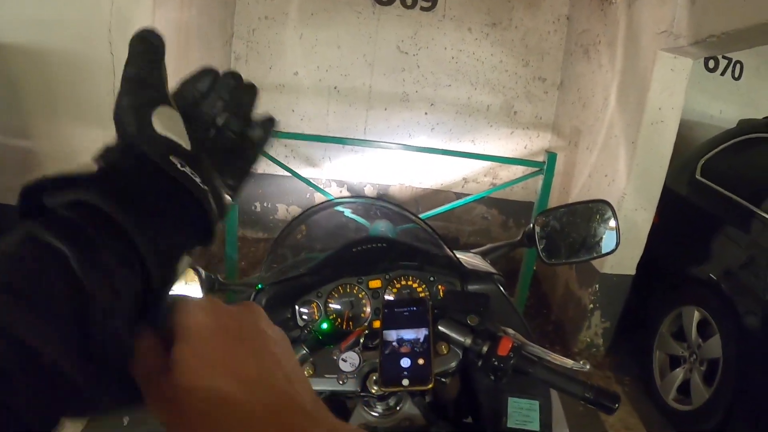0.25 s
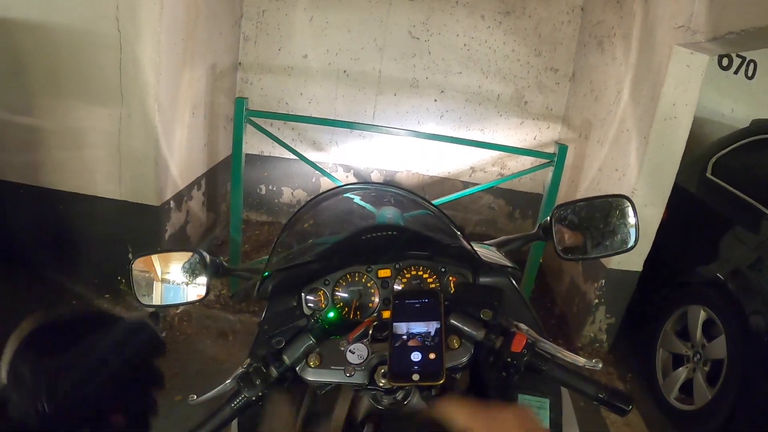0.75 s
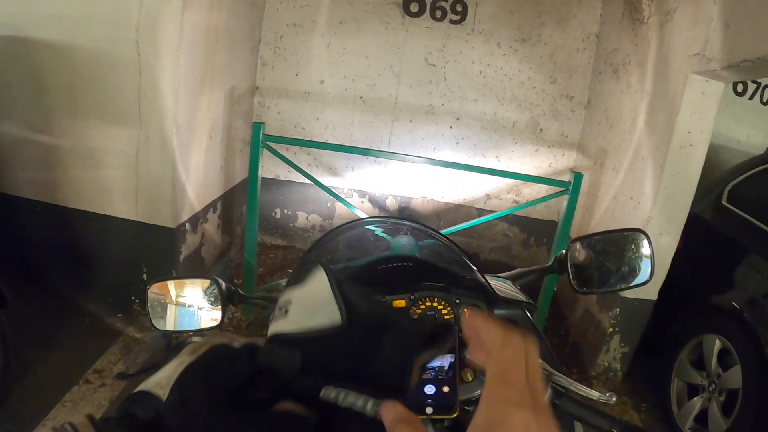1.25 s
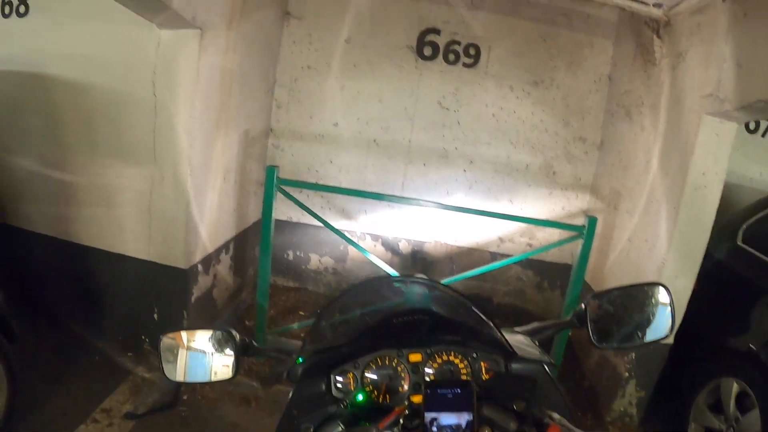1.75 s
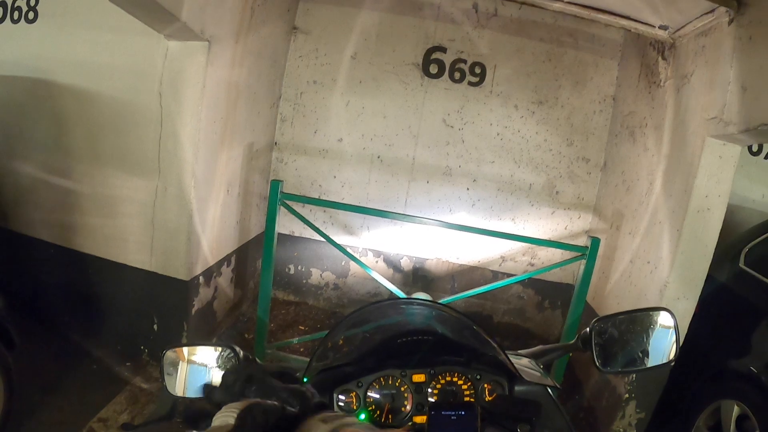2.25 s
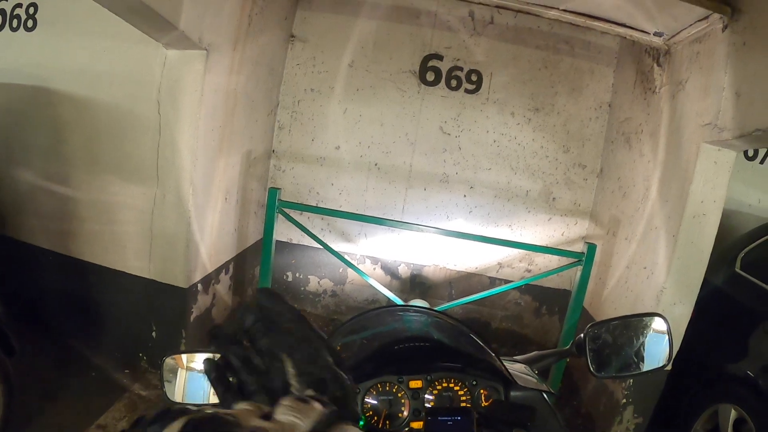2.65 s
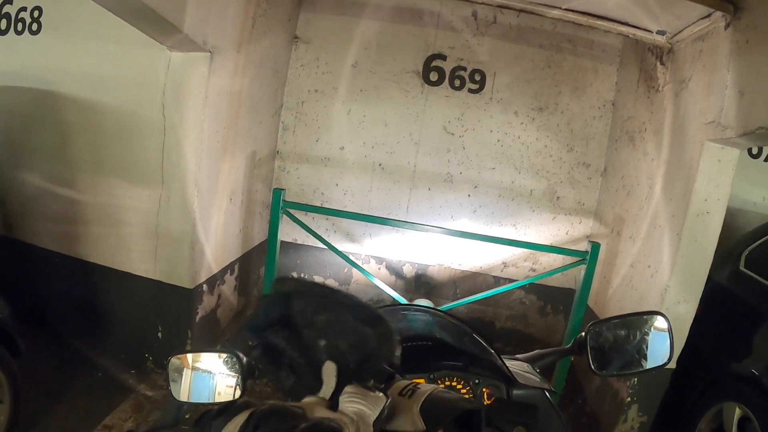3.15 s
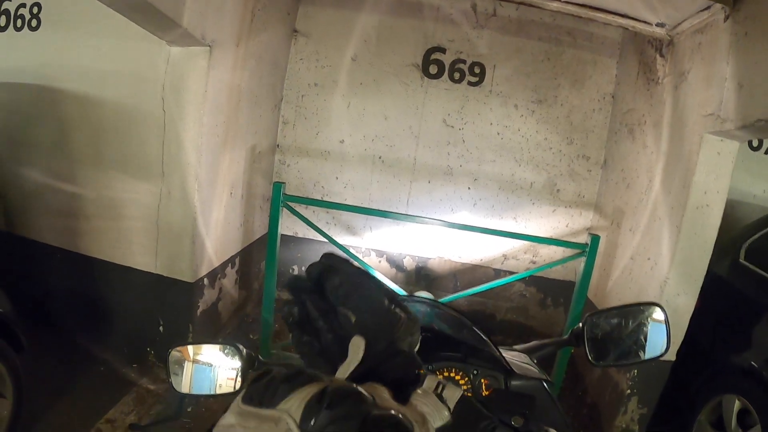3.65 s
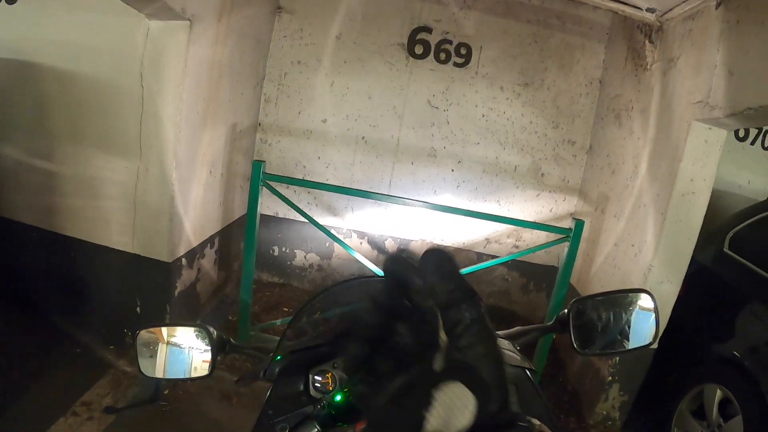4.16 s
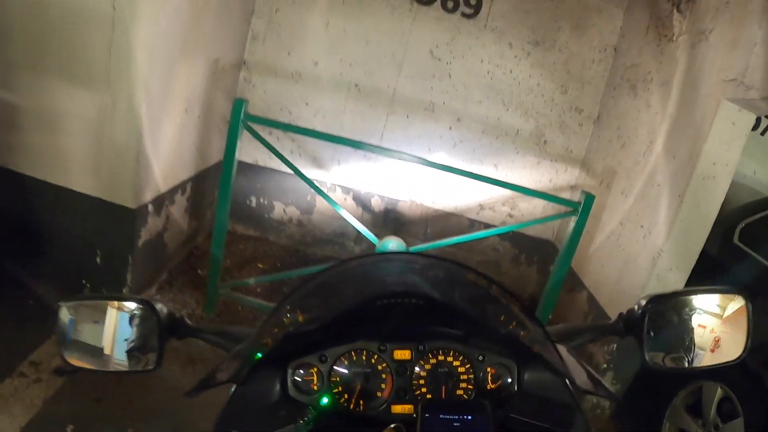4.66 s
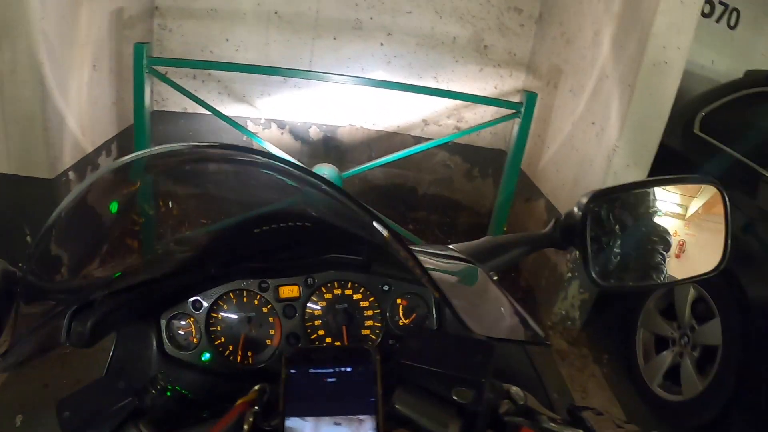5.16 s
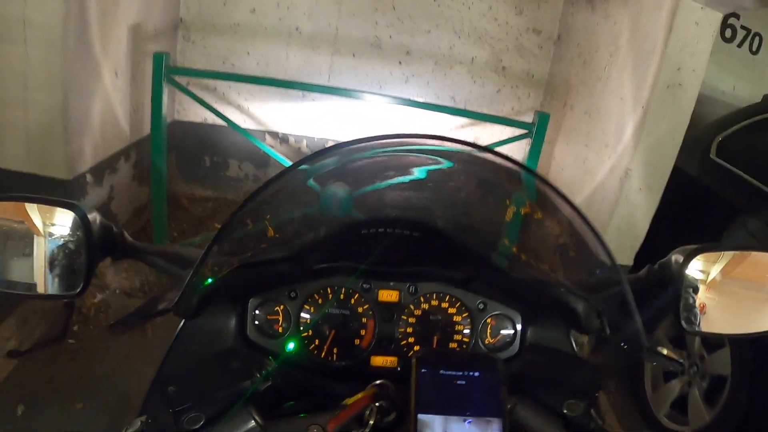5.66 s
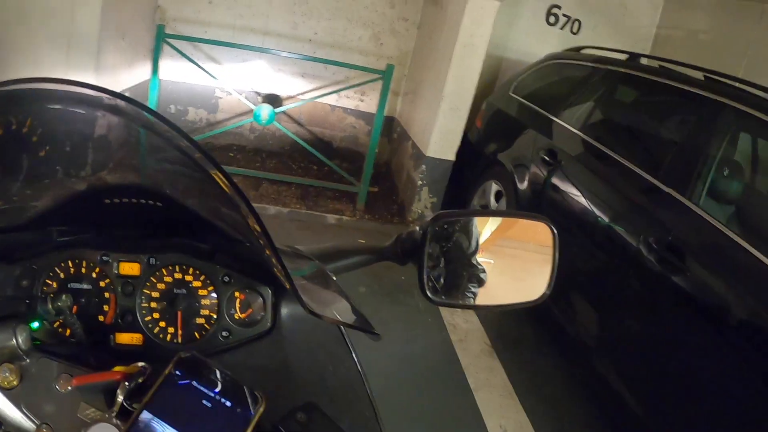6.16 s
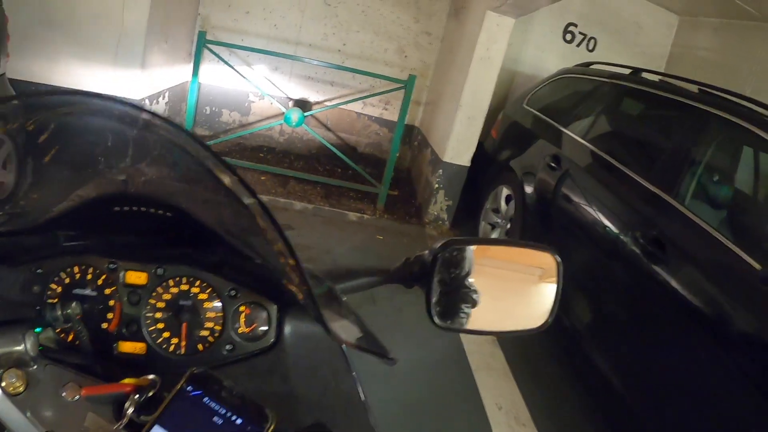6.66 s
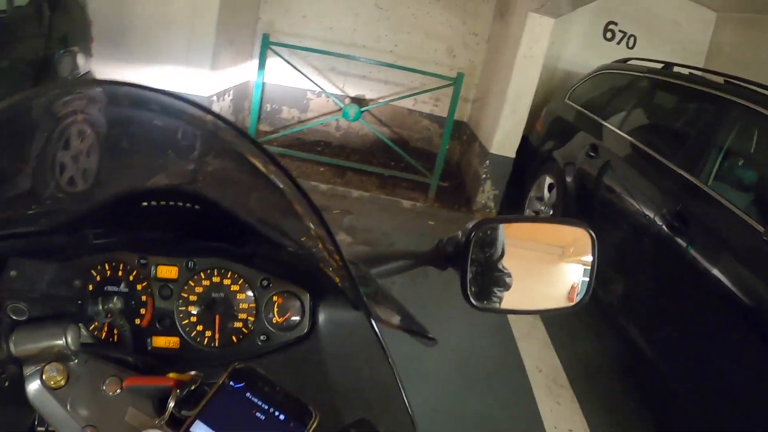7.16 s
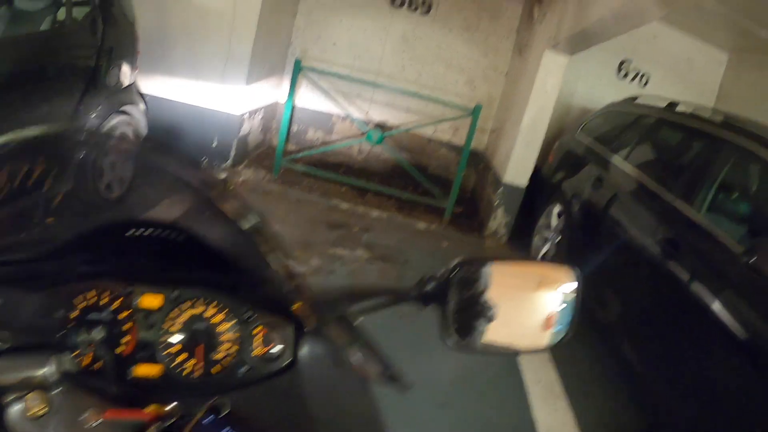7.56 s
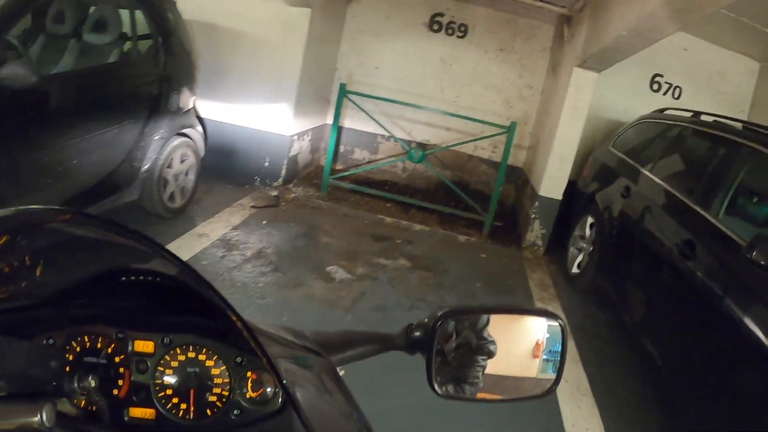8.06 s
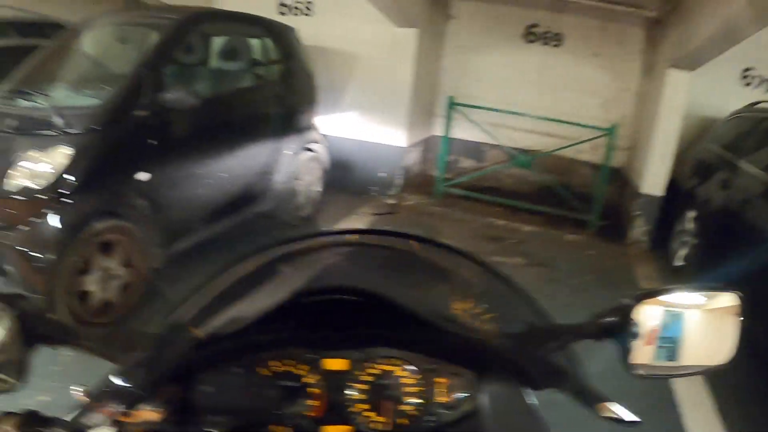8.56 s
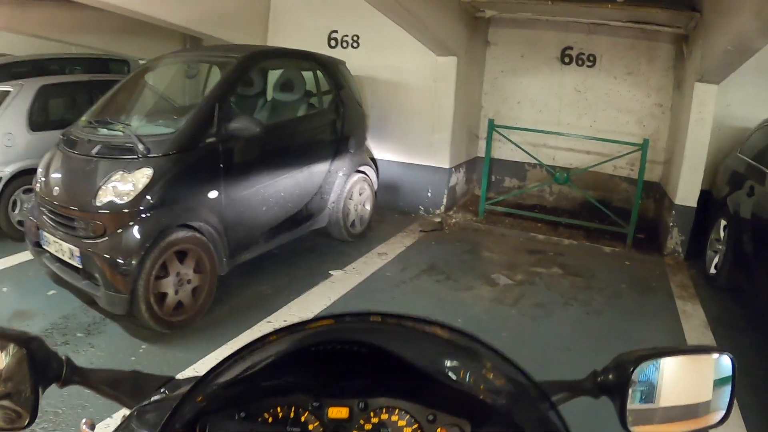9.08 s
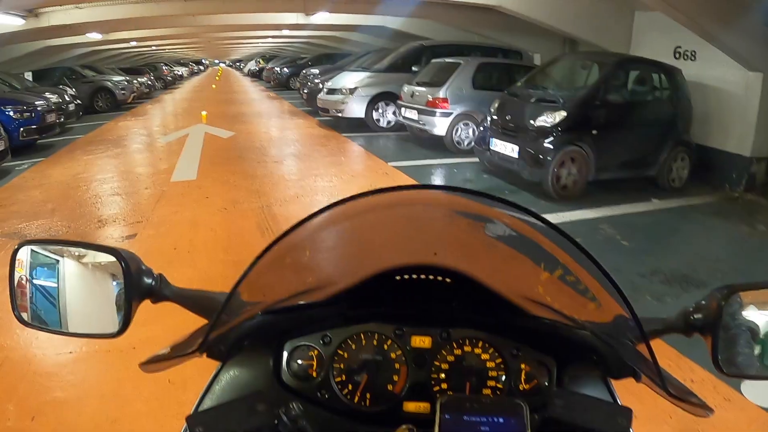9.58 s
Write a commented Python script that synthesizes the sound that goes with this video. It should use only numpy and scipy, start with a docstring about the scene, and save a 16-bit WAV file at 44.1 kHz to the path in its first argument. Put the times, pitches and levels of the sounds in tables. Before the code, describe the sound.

The engine is already running: a deep, uneven putter of about thirty-five pulses a second, with bright ticking and clattering above. Concrete walls add a short, dense echo. Another low engine close by revs and falls back, making the bass throb. Clutch whirr grows during the manoeuvre, with tiny hard clicks, fabric rubbing and fleeting rough squeals, before a modest closing rise. Close stereo pickup at the helmet.

```python
"""Exhaust pulses of an unevenly idling four-cylinder motorcycle boom in a concrete underground car park.
Heard from the rider's helmet: pulses ring the pipe, shaped noise makes the valve clatter, clutch whirr and rustle.
Small parts click as the bike is backed out of its bay; slipping clutch plates squeal in gliding tones.
A second bike, built from harmonics alone, idles and revs close by, beating against the first.
At the end the revs rise as the rider pulls away."""
import sys
import numpy as np
from scipy import signal
from scipy.fft import rfft, irfft, next_fast_len
from scipy.io import wavfile
from scipy.ndimage import uniform_filter1d, minimum_filter1d

SR = 44100
rng = np.random.default_rng(int(sys.argv[2]) if len(sys.argv) > 2 else 0)


def master_out(mix):
    """Clip the mix to full scale and print it as 16-bit PCM to the path in sys.argv[1]."""
    frames = np.transpose(np.atleast_2d(mix))
    ceiling = np.clip(frames, -1, 1)
    pcm = np.round(ceiling * 32767).astype(np.int16)
    wavfile.write(sys.argv[1], SR, pcm)


N = 433062
T = np.arange(N) / SR  # seconds
HZ = np.fft.rfftfreq(16384, 1 / SR)  # frequency grid of every body response

# In all functions "turns" counts firings of the engine, with fractions; levels in dB precede each layer's trim.


def amp(db):
    """Decibels to gain."""
    return 10 ** (np.asarray(db) / 20)


def unit(x):
    """Scales to rms 1."""
    return x / np.sqrt(np.mean(x ** 2) + 1e-20)


def curves(rows):
    """Each column of a table, joined by straight lines sample by sample."""
    s, *columns = np.transpose(rows)
    return [np.interp(T, s, column) for column in columns]


def at_hz(points, hz):
    """Reads a spectrum on a log-frequency axis."""
    f, value = np.transpose(points)
    return np.interp(np.log(hz + 1), np.log(f + 1), value)


def peaks(modes):
    """Magnitude of a set of resonances, their powers added."""
    power = sum(amp(db) ** 2 / (1 + ((HZ - hz) / width) ** 2) ** 2 for hz, width, db in modes)
    return np.sqrt(power)


def shape(points):
    """Magnitude of a spectrum that falls away steeply above its last point."""
    return amp(at_hz(points, HZ)) / (1 + (HZ / points[-1][0]) ** 4)


def ring(x, gain):
    """Passes x through a causal, minimum-phase body with this magnitude response."""
    log_gain = np.log(np.maximum(gain, 1e-5))
    mirrored = np.r_[log_gain, log_gain[-2:0:-1]]
    response = np.exp(np.conj(signal.hilbert(mirrored)))
    impulse = np.fft.ifft(response).real
    return signal.fftconvolve(np.atleast_2d(x), impulse[None], axes=1)[:, :N]


def fade(blows, decay_s):
    """Lets each impulse die away exponentially."""
    return signal.lfilter([1], [1, -np.exp(-1 / (decay_s * SR))], blows + 1e-12)


def steady(x, span_s):
    """Holds the running level near 1, keeping the quick ups and downs."""
    power = uniform_filter1d(x ** 2, max(int(span_s * SR), 1), axis=-1)
    return x / np.sqrt(abs(power) + 1e-3 * np.mean(x ** 2))


def swelled(level, swell):
    """Widens or narrows the swings of a dB curve about its mean."""
    return level.mean() + swell * (level - level.mean())


def waver(rate_hz):
    """A slow random wander of rms 1."""
    s = np.arange(0, N / SR + 1, 1 / 100)
    lowpass = signal.butter(2, min(rate_hz, 40), fs=100, output="sos")
    drift = signal.sosfilt(lowpass, rng.standard_normal(len(s)))
    return unit(np.interp(T + 1, s, drift))  # skips the filter's first second


def arches(spells):
    """One smooth arch for each spell, as high as its row says."""
    rise = np.zeros(N)
    for s, length, height in spells:
        spell = slice(*np.searchsorted(T, [s - length / 2, s + length / 2]))
        rise[spell] += height * np.cos(np.pi * (T[spell] - s) / length)
    return rise


def garage(x, wet_db, count=3, drift_hz=0.831):
    """Adds the concrete's echoes, which die soonest in the top treble and shift as the rider moves."""
    # The garage's reverberation. Each row: frequency in Hz, time to fall 60 dB in seconds.
    decay_times = [(40, 0.32), (150, 1), (500, 0.8), (2000, 0.94), (6000, 0.52), (14000, 0.12)]
    sparse = rng.random((count, 2, SR)) < 3000 / SR  # about 3000 echoes a second
    echoes = rng.standard_normal((count, 2, SR)) * sparse
    hz, t, z = signal.stft(echoes, SR, nperseg=256)
    fall = amp(-60 * t / at_hz(decay_times, hz)[:, None])
    tails = signal.istft(z * fall, SR)[1]
    tails /= np.linalg.norm(tails, axis=-1, keepdims=True)
    phase = drift_hz * T + np.arange(count)[:, None] / count
    shares = np.sqrt(2 / count) * np.cos(np.pi * phase)
    wet = sum(signal.oaconvolve(x * share, tail, axes=1)[:, :N] for share, tail in zip(shares, tails))
    return x + amp(wet_db) * wet


def strokes(turns, strength, spread, jitter_s):
    """One impulse at each whole count, each of its own strength and a little early or late."""
    at = np.flatnonzero(np.diff(np.floor(turns), prepend=-1) > 0)
    size, late = rng.standard_normal((len(at), 2)).T
    place = np.clip(at + (late * jitter_s * SR).astype(int), 0, N - 1)
    out = np.zeros(N)
    out[place] = np.resize(strength, len(at)) + spread * np.tanh(size)
    return out


def per_firing(turns):
    """A new random value for each firing, joined by straight lines."""
    return np.interp(turns, np.arange(SR // 10), rng.standard_normal(SR // 10))


def throttle(speed):
    """How far the throttle is open: it shows in the speed above idle a moment later."""
    idle_hz, pull_hz, lag_s = 36.8, 40.4, 0.02  # firing rates at closed and full opening
    later_speed = np.interp(T + lag_s, T, speed)
    return np.maximum(later_speed - idle_hz, 0) / max(pull_hz - idle_hz, 1)


def harmonic(turns, order, lag=0.1753):
    """One multiple of the firing rate; together they make a sharp push, then a suction, after each firing."""
    return -np.sin(2 * np.pi * order * (turns - lag))


def boom(speed, turns, waves, orders_db, top_hz=114, waver_db=0.83):
    """The regular exhaust beat: three harmonics, each lifted by the standing wave that it lies in."""
    # Which standing wave a harmonic lies in. Each row: frequency in Hz, index of the wave.
    wave_bands = [(45, 0), (56, 1), (86, 1), (96, 2)]
    out = np.zeros(N)
    for k, db in enumerate(orders_db, 1):
        band = np.interp(k * speed, *np.transpose(wave_bands))
        level = sum(wave * np.maximum(1 - abs(band - i), 0) for i, wave in enumerate(waves))
        muffled = 1 / (1 + (k * speed / top_hz) ** 10)
        gain = amp(level + db + waver_db * waver(rate_hz=3.7))
        out += gain * muffled * harmonic(turns, k)
    return out


def putter(speed, turns, waves, drone):
    """The rider's exhaust heard directly: each blow early or late, strong or weak, with a hard edge."""
    # Strengths in dB of the first, second and third multiple of the firing rate.
    orders_db = [-3, -3.5, -1]
    stumble, uneven_db, edge_db = .009, 1.4, -7  # stumble in firings
    turns = turns + stumble * per_firing(turns)
    edge = unit(sum(harmonic(turns, k) / k for k in range(5, 8)))
    blow_gain = amp(uneven_db * per_firing(turns))
    return blow_gain * (boom(speed, turns, waves, orders_db) + amp(drone + edge_db) * edge)


def lope(firings, thud_level, chug_level, thud_db=-12, chug_db=-14, thud_swell=2.2, chug_swell=1.0):
    """The differences between strong and weak firings make the bass thud and chug."""
    # Spectra of the two bass layers. Each row: frequency in Hz, level in dB.
    thud_spectrum = [(20, -35.5), (30, -5.5), (38, 2.5), (48, 9.5), (60, -22), (90, -20)]
    chug_spectrum = [(35, -39), (55, -4), (66, -12), (84, -2), (104, -9.5), (122, -16), (160, -38)]
    fired = firings != 0
    uneven = firings - fired * firings.sum() / np.count_nonzero(firings)
    thud = steady(ring(-uneven, shape(thud_spectrum))[0], span_s=0.33)
    chug = steady(ring(-uneven, shape(chug_spectrum))[0], span_s=0.18)
    thud_gain = amp(swelled(thud_level, thud_swell) + thud_db)
    chug_gain = amp(swelled(chug_level, chug_swell) + chug_db)
    return thud_gain * thud + chug_gain * chug


def exhaust(turns, firings, drone_level, bark_level, drone_db=-14, bark_db=0.0, gas_db=-8, bark_swell=0.64):
    """Each firing rings the pipe and lets out a puff of gas that barks round the garage."""
    # Resonances of the pipe. Each row: frequency in Hz, width in Hz, level in dB.
    pipe_modes = [(148.7, 7.7, -1.5), (179.1, 7.6, -3.5), (196.7, 8.7, -0.5), (214, 6, -4.5)]
    # Spectrum of the bark. Each row: frequency in Hz, level in dB.
    bark_spectrum = [(90, -19), (130, -3.5), (160, 4.5), (220, -5.5), (248, -5), (275, -8.5), (305, -8.5),
                     (345, -20.5), (400, -18), (520, -29), (750, -35), (1500, -55.5)]
    gas = unit(rng.standard_normal((2, N)) * np.exp(-(turns % 1) / 0.62))
    pulses = unit(firings) * np.array([[1], [0]])  # the pulses sit in the middle, the gas spreads
    drive = amp(gas_db) * gas - pulses
    drone = steady(ring(drive, peaks(pipe_modes)), span_s=0.15)
    bark = steady(garage(ring(drive, shape(bark_spectrum)), wet_db=4.5), span_s=0.14)
    return amp(drone_level + drone_db) * drone + amp(swelled(bark_level, bark_swell) + bark_db) * bark


def rasp(turns, rasp_db=-5, puff_turns=2.5):
    """Each puff of gas also rasps in the silencer."""
    # Spectrum of the rasp. Each row: frequency in Hz, level in dB.
    rasp_spectrum = [(240, -31.5), (305, 0), (390, -2), (450, -10), (560, -28)]
    # The exhaust's low mids at the helmet. Each row: time in seconds, level in dB.
    low_mids = [(0, -40), (1.1, -39.5), (1.35, -39.5), (1.8, -39), (3.1, -41.5), (4.2, -38.5), (4.5, -39),
                (6.2, -40.5), (6.7, -33.5), (7.15, -42.5), (7.35, -35), (7.8, -35.5), (8.05, -41.5),
                (8.7, -39), (9, -36), (9.45, -37.5), (9.75, -37.5)]
    level, = curves(low_mids)
    puffs = rng.standard_normal((2, N)) * np.exp(-(turns % 1) / puff_turns)
    return amp(level + rasp_db) * steady(ring(puffs, shape(rasp_spectrum)), span_s=0.6)


def hum(turns, level, count, hum_db):
    """The fourth and higher harmonics take turns to ring the walls as the speed wanders."""
    # Standing waves between the walls. Each row: frequency in Hz, width in Hz, level in dB.
    wall_modes = [(161, 9.4, -7.5), (173.1, 6, 4), (196.4, 8.2, 2.5), (222, 3.3, -8.5), (246.5, 4, -5.5),
                  (255, 4.2, -14.5), (276.5, 24, -10), (299.3, 12.3, -12.5)]
    tones = sum(harmonic(turns, k) for k in range(4, 4 + count))
    return amp(level + hum_db) * unit(ring(tones, peaks(wall_modes))[0])


def valve_gear(turns, level, clatter_db=3, cases_db=0, tap_s=0.0075, whirl=0.97, knock=0.34, knock_s=0.1, swell=1):
    """Valves tap twice a firing, the clutch basket knocks once a cycle, over the rush of chain and gears."""
    # Spectrum of the clatter. Each row: frequency in Hz, level in dB.
    clatter_spectrum = [(200, -16), (450, 4), (650, -2.5), (900, 0.5), (1400, -2), (1750, -3), (2500, -7.5),
                        (3400, -10.5), (3900, -12), (5000, -18.5), (6200, -25), (8000, -30), (10000, -34),
                        (15000, -52.5)]
    # Ringing of the engine cases. Each row: frequency in Hz, width in Hz, level in dB.
    case_modes = [(462, 12, 4), (727, 28, -2), (906, 30, 3.5), (1174.8, 110, -2), (1553, 36, -7.5),
                  (1610, 22, 0), (1710, 18, -1.5), (1779, 35, -1.5), (1910, 30, -6), (2173, 70, -6),
                  (2776, 35, -9), (2890, 30, -10), (3120, 40, -12), (3720, 90, -12.5), (4910, 370, -18),
                  (7730, 300, -27.5)]
    taps = strokes(2 * turns, [.76, .36], spread=0.98, jitter_s=0.0026) ** 2
    knocks = knock * strokes(turns / 4, [1], spread=0.58, jitter_s=0.0033) ** 2
    blows = abs(fade(taps, tap_s) + fade(knocks, knock_s))
    drive = np.sqrt(whirl ** 2 + blows) * rng.standard_normal((2, N))
    body = np.hypot(shape(clatter_spectrum), amp(cases_db) * peaks(case_modes))
    return amp(swelled(level, swell) + clatter_db) * unit(garage(ring(drive, body), wet_db=-10.0))


def gears(turns, level, whine_db=-52, spread=0.28, rattle_s=0.0064, waver_db=1):
    """The primary gears rattle evenly through their backlash at each firing and ring their cover."""
    # Resonances of the gear cover. Each row: frequency in Hz, width in Hz, level in dB.
    cover_modes = [(910, 48, 0), (1120, 70, -5)]
    blows = strokes(turns, [1], spread=spread, jitter_s=0.0037)
    rattle = fade(blows, rattle_s) * rng.standard_normal((2, N))
    cover = steady(garage(ring(rattle, peaks(cover_modes)), wet_db=0.5), span_s=0.19)
    return amp(level + whine_db + waver_db * waver(rate_hz=5.2)) * cover


def tappet(turns, tick_db=-58, tick_s=0.011):
    """One loose tappet ticks brightly once in every four firings."""
    # Spectrum of the tick. Each row: frequency in Hz, level in dB.
    tick_spectrum = [(1100, -17.5), (1700, 7.5), (2500, -1.5), (4500, -4), (8000, -15.5), (11000, -23),
                     (15000, -39)]
    blows = strokes(turns / 4, [1], spread=.2, jitter_s=.001)
    ticks = fade(blows, tick_s) * rng.standard_normal((2, N))
    return amp(tick_db) * unit(garage(ring(ticks, shape(tick_spectrum)), wet_db=1.5, count=2))


def clutch(turns, level, whirr_db=-4, grab_s=0.015, slip=0.5, swell=1.14):
    """The clutch plates grab at each firing and ring near one kilohertz over a constant slipping rub."""
    # Resonances of the plates. Each row: frequency in Hz, width in Hz, level in dB.
    plate_modes = [(1066, 80, -3.5), (1088, 38, -6.5)]
    grabs = fade(strokes(turns, [1], spread=.3, jitter_s=0.0024), grab_s)
    rub = (slip + grabs) * rng.standard_normal((2, N))
    return amp(swelled(level, swell) + whirr_db) * steady(ring(rub, peaks(plate_modes)), span_s=0.057)


def clothing(level, rustle_db=-1, grains_per_s=2500, swell=0.86):
    """Gloves and jacket rub in tiny grains."""
    # Spectrum of the rustle. Each row: frequency in Hz, level in dB.
    rustle_spectrum = [(1500, -26.5), (3500, -3), (6000, 5.5), (9500, -4), (12000, -8), (15500, -16)]
    grains = (rng.random((2, N)) < grains_per_s / SR) * rng.standard_normal((2, N))
    return amp(swelled(level, swell) + rustle_db) * unit(ring(grains, shape(rustle_spectrum)))


def second_bike(waves, drone):
    """Another motorcycle close by, dull and without clatter: harmonics alone, revved as it manoeuvres."""
    # Each row: time in seconds, firings per second, gain of its boom in dB.
    revs = [(0, 35.02, -29), (.45, 34.9, -7), (.6, 40.55, -8), (.85, 35.1, -12), (3.8, 34.73, -15.5),
            (4, 38.4, -5), (4.25, 34.8, -17), (4.42, 36.38, -14), (4.6, 41.38, 4), (4.77, 40.3, 4),
            (4.88, 43.46, 0.5), (5.05, 34.94, -12), (5.55, 33.7, -8), (5.7, 37.5, -4), (5.84, 48.06, 2.5),
            (6, 50.8, 7), (6.17, 49.43, 5.5), (6.42, 49.88, 3), (6.58, 42.8, -0.5), (6.72, 39.06, -2),
            (6.95, 35.18, -10), (7.12, 35.02, -3), (7.25, 44.53, -2), (7.45, 38.84, 0), (7.6, 43.7, -19),
            (7.75, 41.32, -2.5), (7.88, 39.75, -0.5), (8.02, 39.14, 2), (8.3, 39.34, -9), (8.7, 43.8, -2),
            (9.2, 44.3, -3.5), (9.82, 40.2, -3)]
    # Strengths in dB of the first, second and third multiple of its firing rate.
    second_orders_db = [-2.5, -1.5, 5]
    speed, level = curves(revs)
    turns = np.cumsum(speed) / SR
    beat = amp(level) * boom(speed, turns, waves, second_orders_db)
    return beat + hum(turns, drone, count=6, hum_db=-5.0)


def clicks(decay_s=.0035):
    """Each click of keys, zip or controls is a short crack that the garage throws back."""
    # Small hard clicks near the helmet. Each row: start in seconds, level in dB.
    click_times = [(1.0494, -46), (2.7124, -44), (5.1696, -46), (6.4946, -48), (6.6094, -48), (6.707, -44),
                   (7.1748, -45), (9.0788, -46), (9.3153, -44)]
    # Spectrum of the crack. Each row: frequency in Hz, level in dB.
    click_spectrum = [(800, -26), (3000, 11.5), (7000, 1), (11000, -9.5), (15500, -17)]
    blows = np.zeros(N)
    for s, db in click_times:
        blows[int(s * SR)] = amp(db)
    crack = fade(blows, decay_s) * unit(ring(rng.standard_normal((2, N)), shape(click_spectrum)))
    return garage(crack, wet_db=-17, count=2)


def squeal(turns, blur_hz=18, throb=.4, rough=.4):
    """At the hardest slips the plates catch in one rough, wavering note that glides."""
    # Each row: middle in seconds, length in seconds, first pitch in Hz, last pitch in Hz, level in dB.
    slips = [(4.752, .15, 975, 1060, -37), (6.606, .05, 1030, 1120, -37.5), (6.755, .07, 1070, 1030, -40),
             (6.835, .06, 930, 970, -42), (9.69, .08, 1060, 1080, -38), (9.765, .11, 1065, 975, -36)]
    out = np.zeros(N)
    for s, length, first_hz, last_hz, db in slips:
        glide = np.interp(T, [s - length / 2, s + length / 2], [first_hz, last_hz])
        pitch = glide + blur_hz * waver(rate_hz=40)
        swell = np.sqrt(abs(arches([(s, length, 1)])))
        out += swell * amp(db) * np.sin(2 * np.pi * np.cumsum(pitch) / SR)
    roughness = unit(fade(rng.standard_normal(N), .002))
    grip = 1 + throb * np.cos(2 * np.pi * turns) + rough * roughness
    return garage(out * grip * np.array([[1], [.3]]), wet_db=-16.5, count=2)


def ports(pair, lag_s=2.2e-5):
    """Two close microphone ports: alike in the bass, unrelated in the treble, the left a little late."""
    # Each row: frequency in Hz, left-right likeness from 0 to 1.
    likeness = [(100, .997), (250, .988), (500, .91), (1000, .83), (2000, .66), (4000, .3), (8000, .05),
                (13000, .05)]
    # Each row: frequency in Hz, left minus right in dB.
    tilt = [(100, .25), (300, .3), (1000, 1.6), (2300, 2.8), (4500, .5), (8000, -1.6), (13000, 0)]
    size = next_fast_len(N)
    hz = np.fft.rfftfreq(size, 1 / SR)
    mid, side = rfft(pair, size)
    same = np.clip(at_hz(likeness, hz), -.5, 1)
    side = 1j * side * np.sqrt((1 - same) / (1 + same))  # a pressure difference runs a quarter cycle ahead
    lean = amp(at_hz(tilt, hz) / 2) * np.exp(-1j * np.pi * hz * lag_s)
    return irfft([(mid + side) * lean, (mid - side) / lean], size)[:, :N]


def scene(clatter_waver_db=.5, whirr_waver_db=1.1, rustle_waver_db=3.0, clatter_share=0.21, whine_share=0.17):
    """The crank drives every engine layer; all are mixed as mid and side, the direct bass in the middle."""
    # The idle hunts up and down and climbs at the end. Each row: time in seconds, firings per second.
    crank_speed = [(0, 37), (.25, 31), (.4, 35.5), (.52, 32.7), (.7, 34.7), (.85, 33.4), (1.05, 35),
                   (1.18, 31.7), (1.33, 33.3), (1.6, 34), (1.9, 31), (2.1, 32), (2.2, 34), (2.35, 32.8),
                   (2.6, 35.3), (2.9, 35.6), (3, 35.7), (3.2, 33), (3.4, 31.9), (3.9, 35.2), (4.08, 31.8),
                   (4.2, 33.8), (4.4, 31.9), (4.8, 31.2), (5.1, 36.6), (5.3, 37.4), (5.5, 33.5),
                   (5.9, 34.6), (6.3, 33), (6.6, 33.9), (7.05, 35.8), (7.55, 35), (8, 33.8), (8.7, 34.4),
                   (8.88, 29.8), (9.02, 37), (9.14, 34), (9.27, 32.4), (9.41, 37.6), (9.6, 37.8),
                   (9.7, 41.2), (9.82, 40.8)]
    # What a throttle opening of 1 adds to each layer, in dB by layer name.
    throttle_db = {"chug": 3, "drone": 4, "clatter": -3, "whine": -3, "rustle": 3.5}
    # Exhaust bands, which change as the rider moves through the garage's standing waves.
    # Each row: time in seconds, then levels in dB near 35, 70, 100, 175 and 300 Hz.
    standing_waves = [(0, -26, -18.5, -24, -25, -35), (.6, -22, -18.5, -24, -25, -39.5),
                      (1.3, -26, -17, -29.5, -27, -29.5), (1.7, -24.5, -20.5, -18.5, -26, -34),
                      (2.2, -24, -19, -30, -27.5, -35), (2.65, -24, -18, -20, -22.5, -39.5),
                      (3.05, -24, -17.5, -23.5, -26, -38.5), (3.7, -23.5, -18.5, -20.5, -25, -32.5),
                      (4.25, -26.5, -17.5, -24, -25.5, -36), (4.7, -30, -21, -32.5, -25.5, -36),
                      (5.2, -20, -18, -31.5, -25.5, -33.5), (5.65, -25, -20, -25, -26, -33),
                      (5.85, -22.5, -22.5, -19.5, -27.5, -30.5), (6.05, -24, -23, -17.5, -26.5, -26.5),
                      (6.35, -23.5, -20, -23.5, -27, -28), (6.7, -18.5, -23, -22.5, -30, -26),
                      (7.05, -19, -17.5, -24.5, -26, -32.5), (7.6, -21, -20, -25, -24.5, -38.5),
                      (8.2, -19.5, -19, -29.5, -28.5, -33), (8.9, -21.5, -18.5, -23.5, -28.5, -27),
                      (9.27, -18, -22.5, -15, -31, -36), (9.6, -24, -15.5, -23, -29, -30),
                      (9.8, -17, -26.5, -18.5, -19, -33)]
    # Backing the bike out. Each row: time in seconds, then valve clatter, clutch whirr and rustle in dB.
    manoeuvre = [(0, -43.5, -61, -69.5), (2.7, -44.5, -58.5, -68), (3.2, -45, -59, -70),
                 (4.2, -44.5, -48, -66), (4.5, -43.5, -53.5, -67.5), (5.1, -43.5, -57.5, -64.5),
                 (6.3, -42.5, -46, -67.5), (6.6, -41.5, -43.5, -62), (7.1, -43, -48, -67),
                 (8.6, -44.5, -44.5, -71.5), (8.9, -42, -47.5, -75), (9.4, -44.5, -51.5, -69.5),
                 (9.8, -41, -42, -70)]
    # The clutch chatters as the crank picks up or takes load.
    # Each row: middle in seconds, length in seconds, rise of the clutch in dB.
    chatter = [(.498, .12, 4), (1.331, .14, 9), (2.196, 0.12, 11.5), (2.52, 0.17, 8.5), (4.46, .062, 8),
               (4.747, 0.16, 11.5), (5.947, 0.29, 4.5), (6.603, 0.077, 5), (6.748, .08, 5),
               (7.295, .1, 7.5), (7.56, 0.098, 8.5), (8.055, 0.086, 3), (8.93, .21, 4)]
    # Gloves and sleeves brush past. Each row: middle in seconds, length in seconds, rise in dB before swell.
    rubs = [(1.64, .082, 2.5), (2.85, .12, 2), (4.56, .22, 4), (4.77, .17, 3.5), (5.64, .12, 3),
            (6, .08, 0.5), (6.49, .1, 3.5), (6.77, .18, 2.5), (8.95, .24, 3.5)]
    speed, = curves(crank_speed)
    turns = np.cumsum(speed) / SR
    opening, shudder = throttle(speed), arches(chatter)
    lift = {layer: db * opening for layer, db in throttle_db.items()}
    # four cylinders of unequal strength
    firings = strokes(turns, [0.75, 0.45, 0.95, 0.49], spread=0.52, jitter_s=0.00058)
    deep, low, middle, drone, bark = curves(standing_waves)
    waves = (deep, low, middle)
    clatter, whirr, rustle = curves(manoeuvre)
    slack = waver(rate_hz=8.9)  # loose parts rattle in spells
    clatter = clatter + lift["clatter"] + clatter_share * shudder + clatter_waver_db * slack
    whirr = whirr + whirr_waver_db * slack
    rustle = rustle + lift["rustle"] + arches(rubs) + rustle_waver_db * waver(rate_hz=8.4)

    mix = exhaust(turns, firings, drone + lift["drone"], bark) + rasp(turns)
    mix += valve_gear(turns, clatter)
    mix += gears(turns, lift["whine"] + whine_share * shudder) + tappet(turns)
    mix += amp(shudder) * clutch(turns, whirr) + squeal(turns)
    mix += clothing(rustle) + clicks()
    mix[0] += putter(speed, turns, waves, drone) + hum(turns, drone, count=3, hum_db=-9)
    mix[0] += lope(firings, deep, low + lift["chug"]) + second_bike(waves, drone)
    return ports(mix)


def record(dry, hold_s=0.0024, input_db=3.5):
    """A quick limiter with a soft knee holds the exhaust peaks down; then the band limit."""
    ceiling_db, knee, cutoff_hz = -5, 5, 15500
    x = dry * amp(input_db)
    size = max(int(hold_s * SR), 1)
    loudest = abs(x).max(0) / amp(ceiling_db)
    allowed = (1 + loudest ** knee) ** (-1 / knee)
    x = x * uniform_filter1d(minimum_filter1d(allowed, size), size)
    lowpass = signal.firwin(255, cutoff_hz, window=("kaiser", 9), fs=SR)
    return signal.oaconvolve(x, lowpass[None], "same")


dry = scene()
out = record(dry)
master_out(out)
```